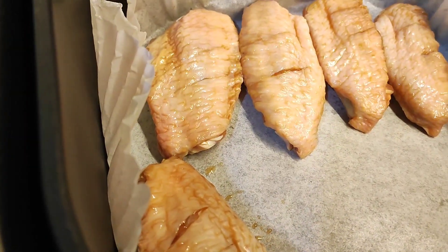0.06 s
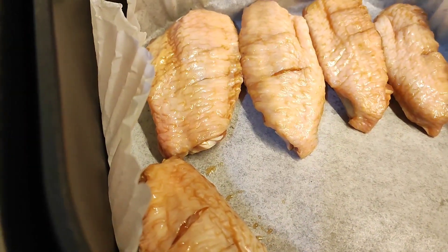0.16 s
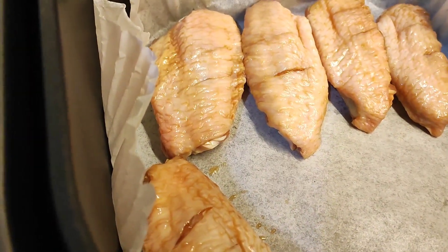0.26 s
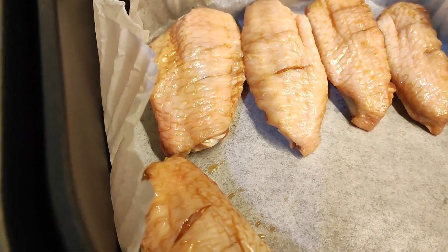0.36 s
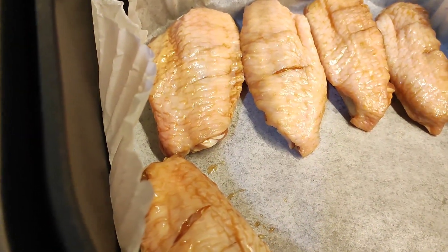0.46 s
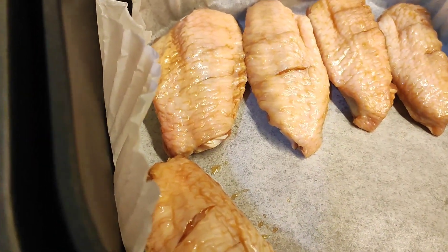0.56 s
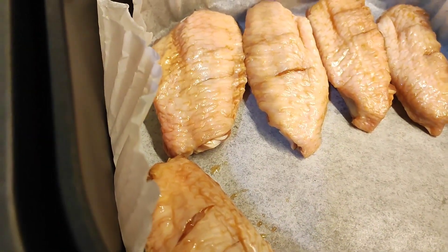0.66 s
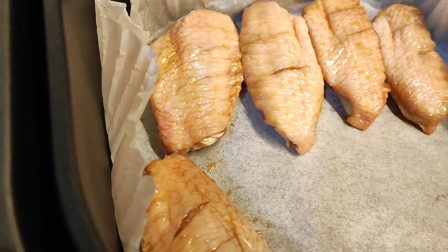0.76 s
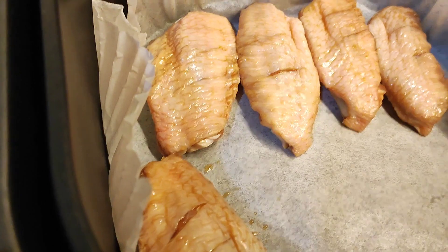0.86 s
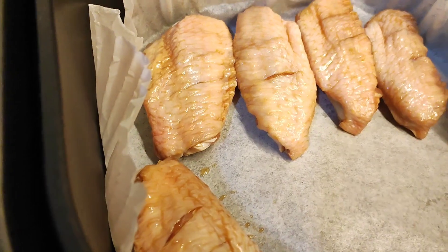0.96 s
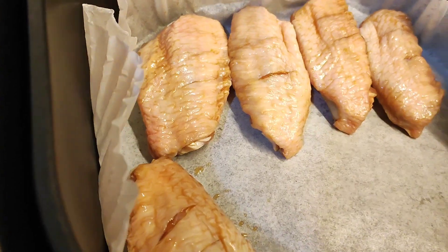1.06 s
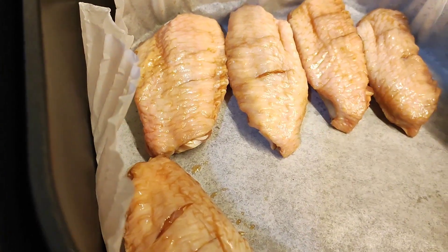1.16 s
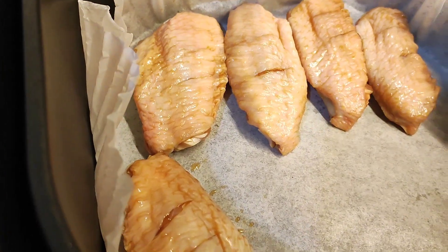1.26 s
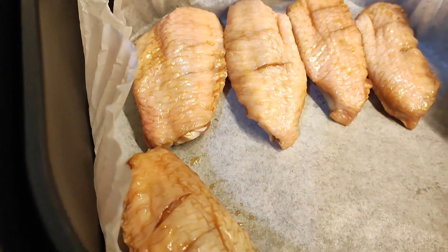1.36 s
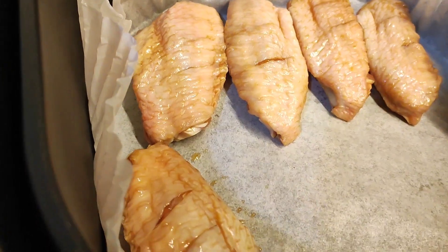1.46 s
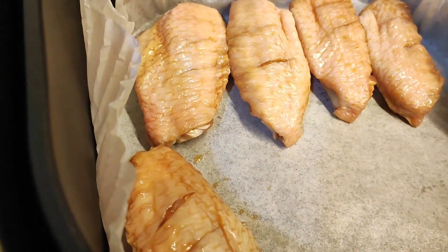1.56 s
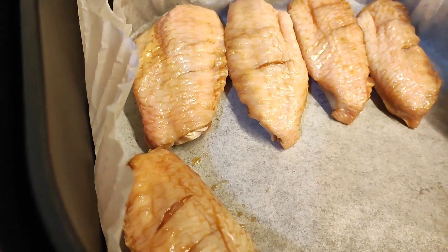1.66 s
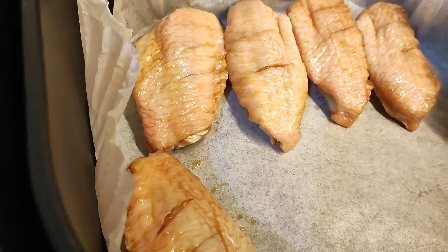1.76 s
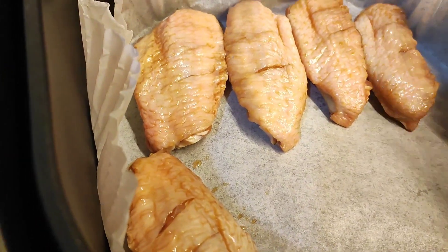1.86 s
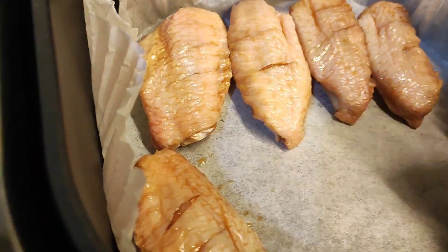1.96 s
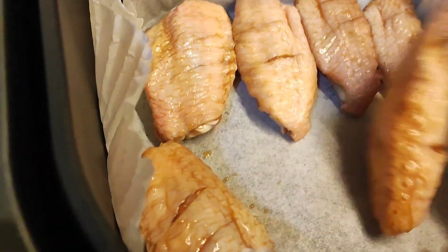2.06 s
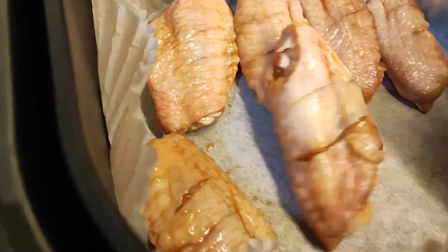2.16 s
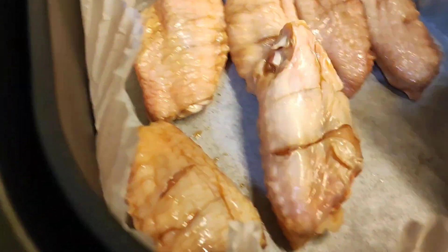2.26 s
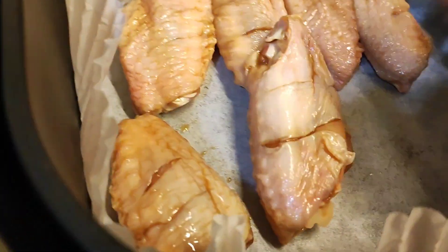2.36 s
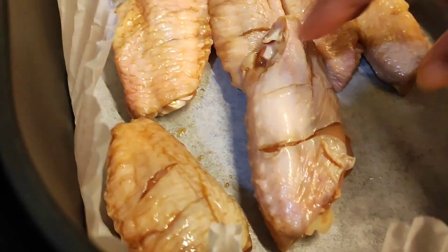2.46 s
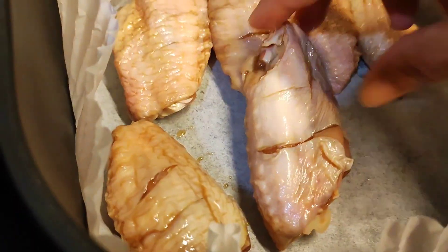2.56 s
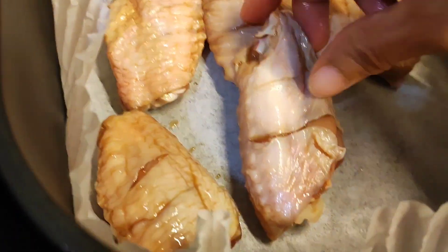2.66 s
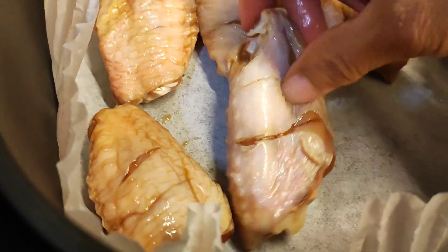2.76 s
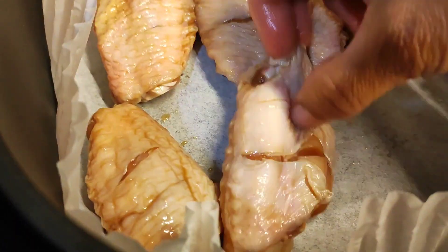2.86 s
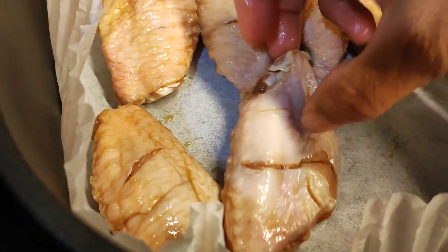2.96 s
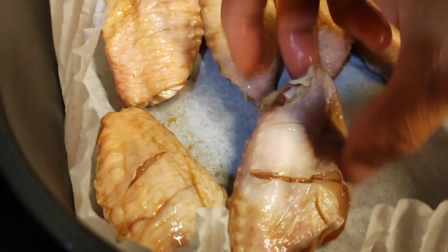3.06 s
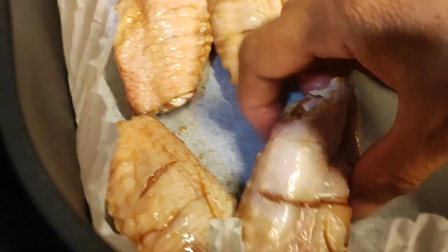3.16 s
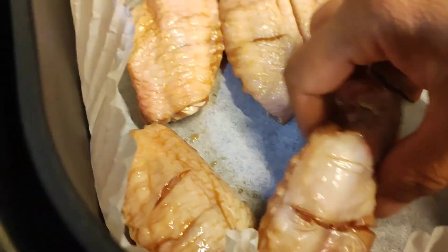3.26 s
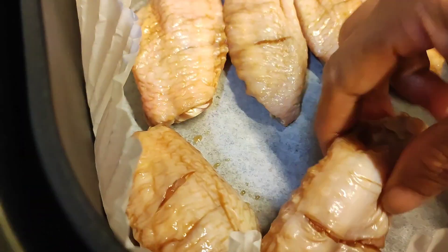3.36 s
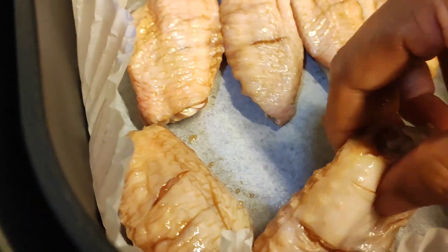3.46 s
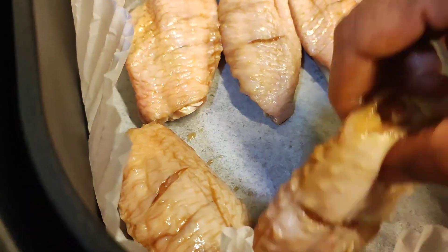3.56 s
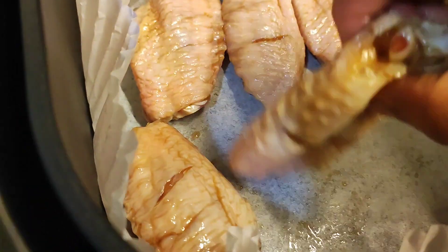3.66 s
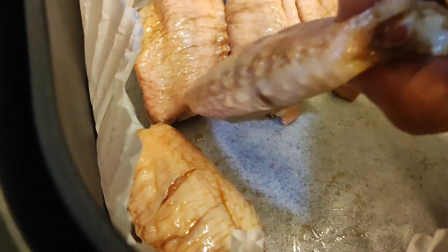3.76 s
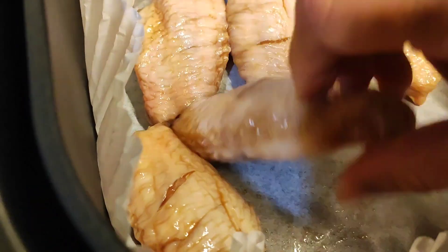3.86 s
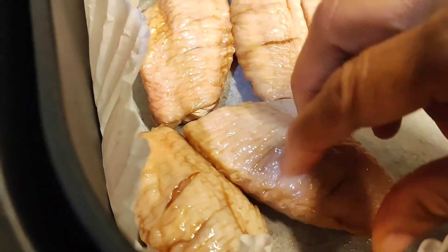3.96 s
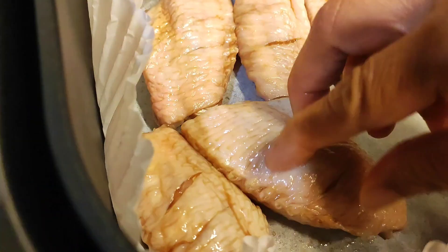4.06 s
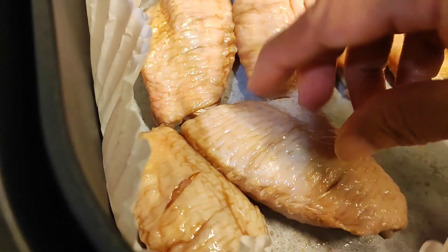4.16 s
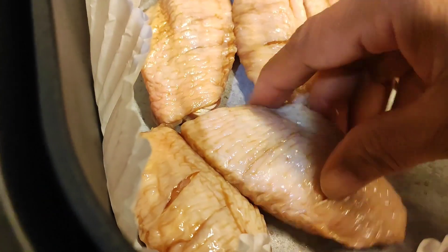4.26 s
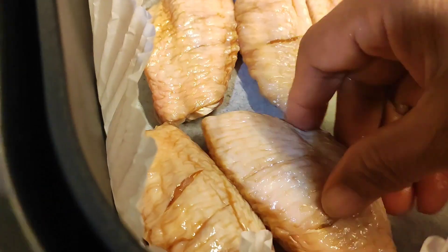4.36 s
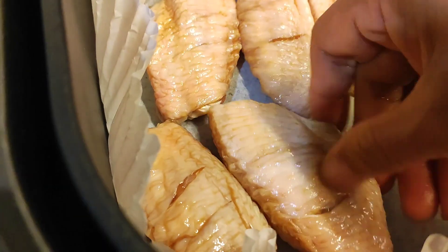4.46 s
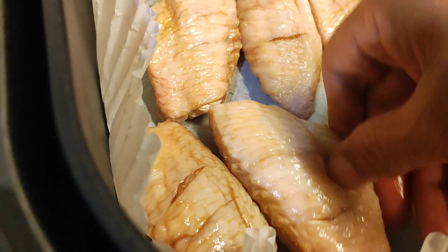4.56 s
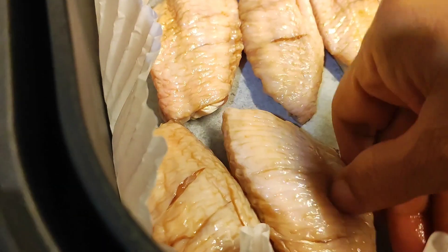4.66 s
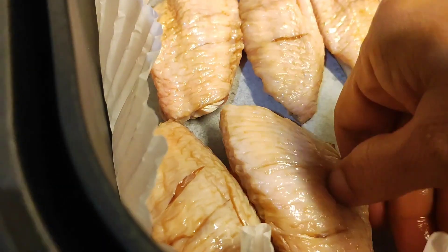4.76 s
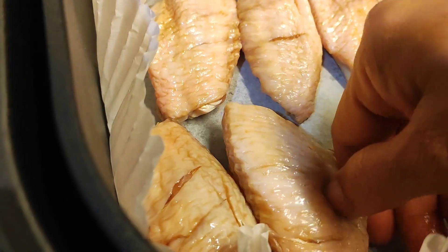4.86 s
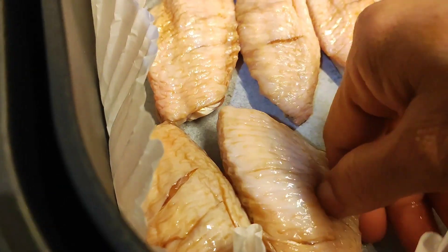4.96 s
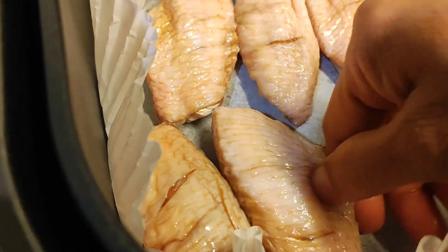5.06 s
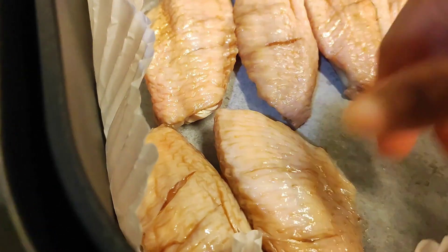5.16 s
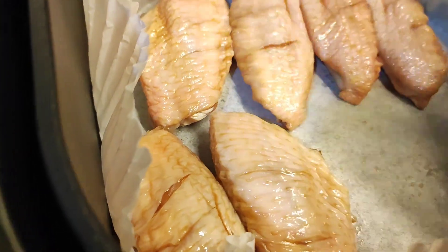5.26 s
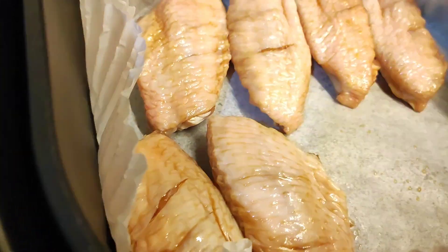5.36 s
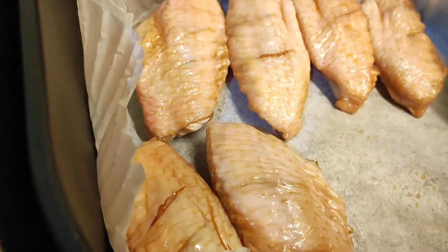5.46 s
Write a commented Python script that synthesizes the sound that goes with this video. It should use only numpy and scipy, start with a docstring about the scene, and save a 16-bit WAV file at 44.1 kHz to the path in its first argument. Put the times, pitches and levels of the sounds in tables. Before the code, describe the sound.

A steady, very quiet low motor hum with fan rumble and slight hiss lies under everything. For the first second there is almost nothing else, only barely audible paper ticks. At about 1.1-1.25 s a dull, hollow knock on the basket comes with a faint snap; a weaker, higher tap follows near 1.85 s. At 2.07-2.15 s comes the loudest event: a dense, bright cluster of wet skin slaps and crisp paper snaps with short basket thuds, trailing crackles until 2.3 s. Then a lull. At 3.17-3.26 s a moderate smack and soft knocks, and at 3.47-3.66 s sticky crackling with a small wet pop. Around 3.9-4.0 s the meat lands with a strong crisp slap and thud. From 4.3 to 5.2 s, lighter smacks, brief drags, ticks and tiny rising pops as it is adjusted, fading to hum. Close stereo perspective, short kitchen reverberation.

```python
"""Chicken wings into a fryer basket

Raw wings are laid by hand into a paper-lined basket in a small kitchen.
Wet skin smacks and paper snaps as flurries of tiny clicks; dragged meat crackles in denser runs.
Nudges and landing meat ring damped basket modes with a dull rattle; air pockets pop as short rising tones.
The kitchen answers with decaying noise, and a motor hums as wavering tones over fan rumble and hiss."""
import sys
import numpy as np
from scipy import signal
from scipy.fft import rfft, irfft
from scipy.io import wavfile

SR = 44100
rng = np.random.default_rng(int(sys.argv[2]) if len(sys.argv) > 2 else 0)


def materialize(psi):
    """Save the field psi as 16-bit PCM at rate SR to the path in sys.argv[1].

    A 1-D psi becomes a single channel; in a 2-D psi each row is a channel.
    """
    bounded = np.clip(np.atleast_2d(psi).T, -1, 1)
    quanta = np.round(bounded * 32767).astype(np.int16)
    wavfile.write(sys.argv[1], SR, quanta)


N = 242550
TIME = np.arange(N) / SR

# The clear smacks of wet skin and snaps of paper.
# Each row: start in seconds, relative level in dB, relative body in dB, relative treble in dB,
# fold resonance in Hz.
SMACKS_AND_SNAPS = [(0.3383, -56, -16, 9, 910), (0.467, -50.5, -21, 7, 2520),
                    (1.018, -65.5, -5, 23.5, 8600), (1.126, -30.5, -10, -10, 2370),
                    (1.202, -37, 2, -3.5, 902), (1.2436, -42.5, 1, -25, 2300),
                    (2.0716, -31.5, -3.5, 14.5, 5080), (2.0793, -18.5, -15, 0, 1030),
                    (2.0894, -6, -14.5, 1.5, 3040), (2.0983, -11.5, -8.5, -17, 950),
                    (2.1185, -21, -20, 10.5, 1270), (2.1314, -27, -8.5, 14, 3070),
                    (2.141, -15, -21, 6, 5010), (2.1466, -17, -26.5, -12, 4710),
                    (2.2242, -20.5, -22, -12.5, 2320), (2.2302, -19, -14, 0.5, 2450),
                    (2.31, -29.5, -3, -34, 945), (2.9351, -43, -8, -29, 2230),
                    (3.1751, -32.5, 2.5, -16, 937), (3.1886, -19, -9.5, -4.5, 2400),
                    (3.3725, -43.5, 1.5, -29.5, 1410), (3.476, -21, -33, -14.5, 1310),
                    (3.533, -22, -7, -2, 996), (3.544, -24.5, -29, -11, 4430),
                    (3.5736, -22, -21, -5.5, 1200), (3.6425, -21.5, -3, -7.5, 1090),
                    (3.6586, -24, -11, -4.5, 947), (3.911, -23, -18, -5.5, 2410),
                    (3.9703, -32, -8, -10, 2390), (3.9939, -20.5, -17.5, -10, 1350),
                    (4.001, -9.5, -14, 4.5, 2730), (4.3166, -18, -5.5, -5, 1380),
                    (4.3284, -23, -30, -0.5, 2750), (4.371, -30.5, -5, -11, 1180),
                    (4.4541, -20, -6, -8, 3000), (4.5037, -38.5, -7, -2, 3330),
                    (4.6706, -21, -19, -11.5, 1060), (4.69, -18, -32, -3, 1420),
                    (4.7431, -32, -27, 6.5, 3750), (4.7937, -28, -14, -2, 2420),
                    (4.8436, -23, -16, -13, 2430), (4.9746, -45.5, -0.5, -28, 1410),
                    (5.1191, -26, -27, -10.5, 3700), (5.1915, -35.5, -10, -29.5, 1034)]


def snaps(level_db=-11.0, treble_db=2.0, full_swell_s=.003, growth=.45):
    """Each snap is a quick flurry of ruptures; returns the near sound and the impulse sent to the room."""
    near, far = np.zeros((2, N)), np.zeros((2, N))
    t = TIME[:SR // 12]
    impulse = signal.unit_impulse(len(t))[None]
    for s, db, body, treble, fold_hz in list(SMACKS_AND_SNAPS) + creases():
        # a harder contact spreads over more skin and takes longer
        swell_s = full_swell_s * from_db(growth * db)
        swell = t / swell_s * np.exp(-t / swell_s)
        clicks = grains(per_s=12000, spread_db=1.5, size=len(t)) * swell
        clicks[0] += .3  # first touch
        gain = from_db(db + level_db) * np.sqrt(SR / 200)
        tone = body, treble + treble_db, fold_hz
        pan_db, _ = hand_at(s)
        add(near, s, gain * placed(pan_db) * voiced(cavity(clicks), *tone))
        add(far, s + swell_s, gain * rng.choice([-1, 1]) * voiced(impulse, *tone))
    return near, far


def voiced(x, body_db, treble_db, fold_hz, fold_db=2.5, fold_q=4.5, soft_hz=3400):
    """Tone of one snap: body from the meat, a broad resonance of the fold, treble from the paper."""
    fold = signal.lfilter(*signal.iirpeak(fold_hz, fold_q, fs=SR), x + 1e-18)
    x = x + from_db(fold_db) * fold
    # wet skin rounds off the middle range
    middle = band(x, [1100, 5800], "band")
    smack = signal.lfilter(*signal.butter(1, soft_hz, fs=SR), middle)
    body = from_db(body_db) * unit_energy(band(x, [300, 1050], "band"))
    treble = from_db(treble_db) * unit_energy(band(x, 5400, "high"))
    return body - unit_energy(smack) + treble


# Meat dragged over the liner.
# Each row: start in seconds, length in seconds, relative level in dB.
MEAT_DRAGS = [(0.242, 0.16, -79.5), (2.066, 0.028, -45), (2.083, 0.018, -29), (2.106, 0.06, -38),
              (2.164, .11, -46.5), (2.45, 0.06, -67), (3.168, 0.035, -49.5), (3.195, .09, -49),
              (3.53, 0.18, -49.5), (3.901, .08, -55.5), (3.986, 0.053, -49), (4.307, 0.023, -40),
              (4.339, .14, -52), (4.66, 0.1, -48.5), (4.898, 0.205, -74.5), (5.148, 0.0705, -61.5)]


def drags(edge_s=0.006):
    """Sticky skin slips over the paper in a dense run of small crackles."""
    out = np.zeros((2, N))
    for s, length_s, db in MEAT_DRAGS:
        t = TIME[:round((length_s + .04) * SR)]
        stroke = np.clip(np.minimum(t, length_s - t) / edge_s, 0, 1)
        crackle = stroke * grains(per_s=1200, spread_db=1.0, size=len(t))
        add(out, s, from_db(db) * rms_one(cavity(crackle)))
    # soft meat damps the high end: Hz, dB
    return colour(out, [(120, -42), (400, 12.5), (1200, 10), (3000, 6.5), (6000, -3.5), (14000, -6.5)])


def creases(per_s=50, typical_db=-34, typical_drag_db=-50.0, follows=0.87, spread_db=3.5,
            body_db=-11.0, treble_db=-8.5, low_hz=1000, high_hz=2800):
    """Creases give way unevenly along each drag, louder under a harder one; rows as for the snaps."""
    rows = []
    for start, length_s, drag_db in MEAT_DRAGS:
        db = typical_db + follows * (drag_db - typical_drag_db)
        # one crease at a random moment in each equal slot of the drag
        for slot, (when, strength, fold) in enumerate(rng.random(size=(40, 3))):
            delay_s = (slot + when) / per_s
            if delay_s < length_s:
                fold_hz = low_hz * (high_hz / low_hz) ** fold
                crease_db = db + spread_db * (2 * strength - 1)
                rows.append((start + delay_s, crease_db, body_db, treble_db, fold_hz))
    return rows


# Colour of the crackle inside the basket.
# Each row: frequency in Hz, gain in dB.
CRACKLE_COLOUR = [(150, -35), (400, 5.5), (700, -3.5), (1300, 2), (1900, -2.5), (3000, 1), (5000, 0.5),
                  (8000, 0.5), (9500, -3), (11500, 0.5), (14000, -3.5)]


def lined_basket(x):
    """The paper-lined basket tints the crackle made inside it."""
    return colour(x, CRACKLE_COLOUR)


def cavity(clicks, fade_s=0.012):
    """A click reaches the microphones directly, then scattered between the basket walls."""
    t = TIME[:SR // 25]
    response = unit_energy(stereo_noise(size=len(t)) * np.exp(-t / fade_s))
    # the direct sound reaches each microphone a few samples apart
    response[[0, 1], rng.integers(10, size=2)] += 1
    return unit_energy(signal.fftconvolve(clicks[None], response, axes=1)[:, :len(clicks)])


# Where the hand works, gliding between rows.
# Each row: time in seconds, left over right in dB, relative level sent to the room in dB.
HAND_PATH = [(2.15, -3.5, -0.5), (2.4, 1, 2.8), (3.1, 1.0, -2.5)]


def hand_at(s):
    """Left-right balance and relative room level of the handling at time s."""
    times, pan_db, room_db = np.transpose(HAND_PATH)
    return np.interp(s, times, pan_db), np.interp(s, times, room_db)


# Resonances of basket and tray.
# Each row: frequency in Hz, relative level in dB, time to fall 60 dB in seconds.
BASKET_MODES = [(89, 7.5, 0.1), (152, -4, 0.24), (181.5, 2, 0.15), (231, 0.5, 0.24), (284.5, -3, 0.2),
                (340, -5, 0.12), (372, -6, 0.17), (432, -2, 0.15), (498.2, 1, 0.14), (531, -3.5, 0.17),
                (633, -2, 0.094), (698, -3, .08), (758, -0.5, 0.066), (894, -1, 0.034), (908, -4.5, 0.21),
                (1000, -0.5, 0.096), (1098, -10.5, .14), (1212, -3.5, 0.087), (1464, -9, 0.15),
                (1554, -9, 0.088), (1753, -5.5, .06)]


def knocks(rise_s=.002, phase_spread=0.0017, rattle_db=-2.5, rattle_s=0.021):
    """A blow rings the basket modes near its own pitch: soft meat low, bone and fingernail higher."""
    out, t = np.zeros((2, N)), TIME[:SR // 3]
    hz, mode_db, t60 = np.transpose(BASKET_MODES)[:, :, None]
    bins = np.maximum(np.fft.rfftfreq(len(t), 1 / SR), 1)
    for s, db, centre_hz, octaves, pan_db in blows():
        # share of the blow at each frequency, with long skirts
        reach = lambda f: (1 + (np.log2(f / centre_hz) / octaves) ** 2 / 6) ** -3
        # the two microphones differ more in phase for the higher modes; spread in radians per Hz
        phase = rng.uniform(0, 2 * np.pi, hz.shape)
        phase = phase + phase_spread * hz * rng.standard_normal((2, len(hz), 1))
        modes = from_db(mode_db - 60 * t / t60) * np.sin(2 * np.pi * hz * t + phase)
        ring = (reach(hz) * modes).sum(axis=1)
        # the many heavily damped modes of tray and meat merge into a short dull burst
        dull = reach(bins) / (1 + (bins / (3 * centre_hz)) ** 2)
        burst = irfft(rfft(stereo_noise(size=len(t))) * dull, len(t))
        rattle = burst * np.exp(-t / rattle_s)
        blow = unit_energy(ring) + from_db(rattle_db) * unit_energy(rattle)
        blow = blow * (1 - np.exp(-(t / rise_s) ** 2))
        add(out, s, from_db(db) * np.sqrt(SR / 300) * placed(pan_db) * unit_energy(blow))
    return out


# Blows on the basket.
# Each row: start in seconds, relative level in dB, centre of the first contact in Hz,
# its spread in octaves, settling weight in dB against the first contact, left over right in dB.
BASKET_BLOWS = [(1.125, -37, 500, 1.8, -7.5, 0), (1.134, -38, 1083, 0.02, -2, -4),
                (1.191, -17.5, 396, 0.58, -6, -0.5), (1.254, -46.5, 1085, 0.025, -20, 6),
                (1.854, -29, 1450, 0.59, 2, -0.5), (2.094, -20.5, 720, 0.9, 0.5, -9),
                (2.118, -22, 399, 0.79, -11, -9.5), (2.142, -29.5, 438, 1.5, -11.5, -7),
                (3.188, -31, 560, 0.43, -25, 2), (3.230, -36.5, 470, 0.7, -12.5, 1),
                (3.262, -38.5, 400, 1.6, -10, 0.5), (3.909, -27.5, 515, 0.36, -19, 0.5),
                (4.004, -24.5, 900, 2.03, -5, -1.5), (4.314, -34, 800, 1.3, -16, 0),
                (4.456, -39, 560, 0.64, -15, 1)]


def blows(settle_s=.005, pitch_ratio=.4, widens=1.3):
    """Each knock is a first contact, then the weight settling a moment later, lower and broader."""
    for s, db, hz, octaves, weight_db, pan_db in BASKET_BLOWS:
        yield s, db, hz, octaves, pan_db
        yield s + settle_s, db + weight_db, hz * pitch_ratio, octaves * widens, pan_db


# Air pockets popping under wet skin.
# Each row: start in seconds, initial level in dB, starting pitch in Hz, time to fall 60 dB in seconds.
AIR_POCKETS = [(3.4746, -22, 1360, 0.024), (4.314, -29, 1366, 0.031), (4.436, -36, 1324, 0.047),
               (4.648, -44, 1315, 0.033), (4.691, -34, 1434, 0.036), (4.716, -32.5, 1380, 0.028),
               (4.843, -36, 1500, 0.013), (5.165, -36, 1256, 0.016), (5.193, -46, 1350, 0.011)]


def pops(glide=0.1, lag_s=.0001):
    """A pocket opens and rings in a short decay, rising slightly in pitch."""
    out = np.zeros((2, N))
    # the right microphone hears it slightly later
    t = np.maximum(TIME[:SR // 12] - [[0], [lag_s]], 0)
    for s, db, hz, t60 in AIR_POCKETS:
        tone = np.sin(2 * np.pi * hz * t * (1 + glide * t / t60))
        add(out, s, from_db(db - 60 * t / t60) * tone)
    return out


# Kitchen reverberation.
# Each row: frequency in Hz, time to fall 60 dB in seconds.
KITCHEN_DECAY = [(150, 0.9), (500, 0.48), (1500, 0.39), (4000, 0.37), (12000, 0.32)]


def kitchen(x, build_s=0.0015):
    """Diffuse reflections build up, then die away at a different rate in each octave."""
    t = TIME[:SR * 3 // 4]
    white, tail = stereo_noise(size=len(t)), 0
    for hz in 125 * 2. ** np.arange(8):
        octave = band(white, [hz / np.sqrt(2), hz * np.sqrt(2)], "band")
        tail = tail + octave * from_db(-60 * t / at_hz(KITCHEN_DECAY, hz))
    # room colour: Hz, dB
    tail = colour(tail, [(100, -5.5), (1500, 6.5), (5000, 3), (14000, 3)]) * (1 - np.exp(-t / build_s))
    return signal.fftconvolve(x, unit_energy(tail), axes=1)[:, :N]


# Motor lines. Each row: frequency in Hz, relative level in dB, waver as a share of the steady tone.
MOTOR_LINES = [(100.1, -54, 0.21), (73, -68, 1), (233.6, -75.5, 0.84), (359.7, -72, 0.3), (520, -78, 0.55)]
# Fan rumble and hiss. Each row: frequency in Hz, relative density in dB per Hz.
FAN_AIR = [(20, -2.5), (36, -18.5), (50, -8.5), (70, -12.5), (100, -1.5), (130, -7.5), (170, -11.5),
           (280, -8.5), (385, -5), (450, -17.5), (800, -24.5), (2300, -31), (4800, -37), (8500, -48.5),
           (14000, -37.5)]


def motor(air_db=-54):
    """Motor lines waver in level and phase over fan rumble and a faint hiss."""
    lines = 0
    for hz, db, waver in MOTOR_LINES:
        wander = 1 + waver * (drift(6.0) + 1j * drift(6.5))
        tone = np.real(wander * np.exp(2j * np.pi * hz * TIME))
        lines = lines + from_db(db) * np.sqrt(2) * tone
    air = from_db(air_db) * rms_one(colour(stereo_noise(size=N), FAN_AIR))
    return lines * from_db([[-.8], [.7]]) + air  # tones slightly stronger on the right


# How alike the two microphones hear diffuse sound.
# Each row: frequency in Hz, correlation from 0 to 1.
LEFT_RIGHT_LIKENESS = [(25, 1), (70, 0.58), (350, .75), (700, 0), (1500, 0), (15000, 0)]


def stereo_noise(size):
    """White noise on two spaced microphones: alike in the deep bass, unrelated in the treble."""
    alike = np.clip(at_hz(LEFT_RIGHT_LIKENESS, np.fft.rfftfreq(size, 1 / SR)), -1, 1)
    mid, side = rfft(rng.standard_normal((2, size)))
    spectra = np.sqrt(1 + alike) * mid + np.sqrt(1 - alike) * side * [[1], [-1]]
    return rms_one(irfft(spectra, size))


def grains(per_s, spread_db, size):
    """Tiny ruptures at random moments, a few larger than the rest."""
    born = rng.random(size) < per_s / SR
    sign = rng.choice([-1, 1], size)
    return born * sign * from_db(spread_db * np.minimum(rng.exponential(1, size), 4))


def drift(rate_hz):
    """Slow random wander of spread 1."""
    slow = 1 / (1 + (np.fft.rfftfreq(N, 1 / SR) / rate_hz) ** 4)
    return rms_one(irfft(rfft(rng.standard_normal(N)) * slow, N))


def placed(pan_db):
    """Left and right gains for a level difference, positive towards the left."""
    return from_db(.5 * pan_db * np.array([[1], [-1]]))


def colour(x, spectrum):
    """Apply a smooth spectrum."""
    size = x.shape[-1]
    return irfft(rfft(x) * from_db(at_hz(spectrum, np.fft.rfftfreq(size, 1 / SR))), size)


def band(x, hz, kind):
    """Second-order Butterworth design."""
    sos = signal.butter(2, np.clip(hz, 10, .45 * SR), kind, fs=SR, output="sos")
    return signal.sosfilt(sos, x + 1e-18)


def at_hz(points, hz):
    """Read a table on a log-frequency axis."""
    freq, value = np.transpose(points)
    return np.interp(np.log(np.maximum(hz, 1)), np.log(freq), value)


def from_db(db):
    """Decibels to gain."""
    return 10 ** (np.asarray(db) / 20)


def rms_one(x):
    """Scale to unit rms."""
    return x / np.sqrt(np.mean(x ** 2) + 1e-20)


def unit_energy(x):
    """Scale to unit energy, averaged over the channels."""
    return rms_one(x) / np.sqrt(x.shape[-1])


def add(out, s, sound):
    """Mix a sound in at time s."""
    start = max(round(s * SR), 0)
    part = sound[:, :N - start]
    out[:, start:start + part.shape[1]] += part


def scene():
    """Handling sounds close to the microphones, the kitchen answering, the motor behind."""
    hum = motor()
    rustle, wet = drags(), pops()
    thuds = band(knocks(), 55, "high")  # the small basket radiates little deep bass
    near, far = snaps()
    close = lined_basket(near + rustle) + thuds + wet
    radiated = from_db(-10.5) * lined_basket(far + rustle) + from_db(-14.0) * thuds + from_db(-3) * wet
    _, room_db = hand_at(TIME)
    return close + kitchen(from_db(room_db) * radiated) + hum


def record(dry, top=.8, cutoff_hz=14300):
    """The loudest peaks are rounded and the top is cut steeply."""
    rounded = top * np.tanh(dry / top)
    steep = signal.ellip(9, .2, 75, cutoff_hz, fs=SR, output="sos")
    return signal.sosfilt(steep, rounded)


dry = scene()
out = record(dry)
materialize(out)
```